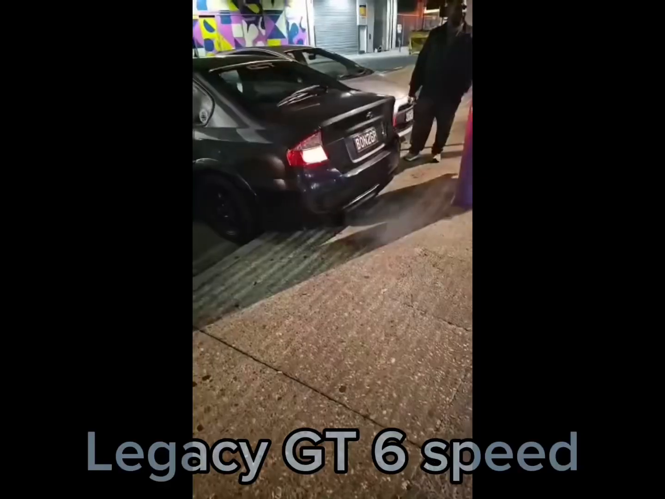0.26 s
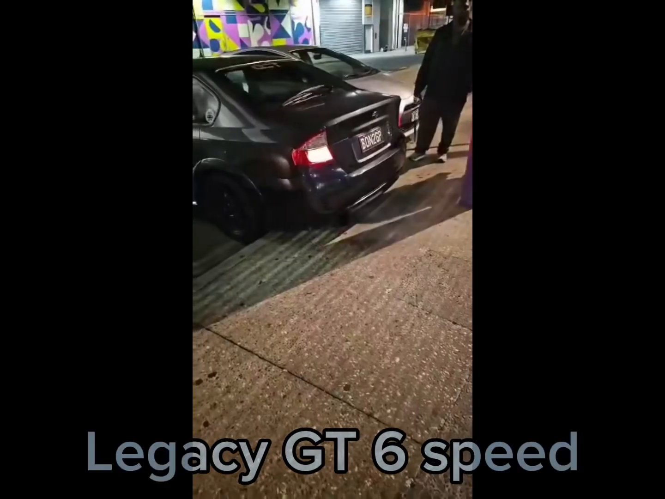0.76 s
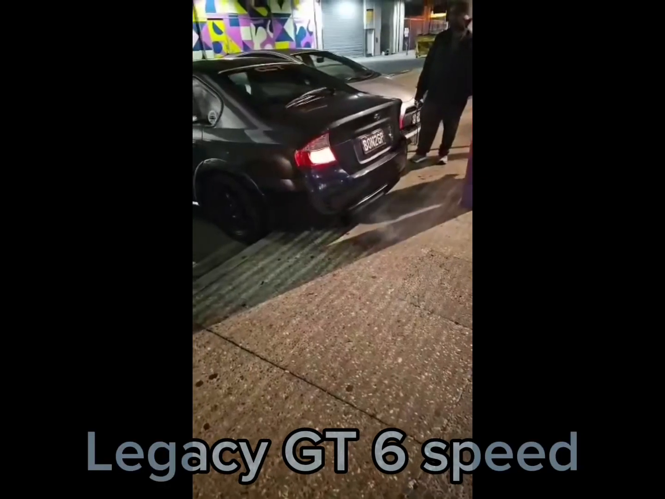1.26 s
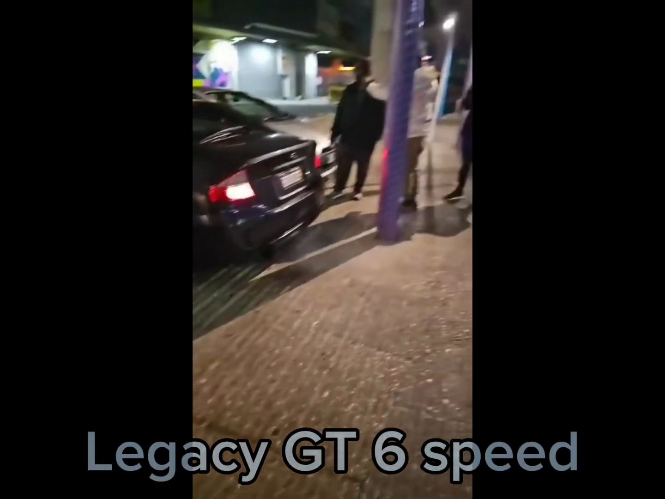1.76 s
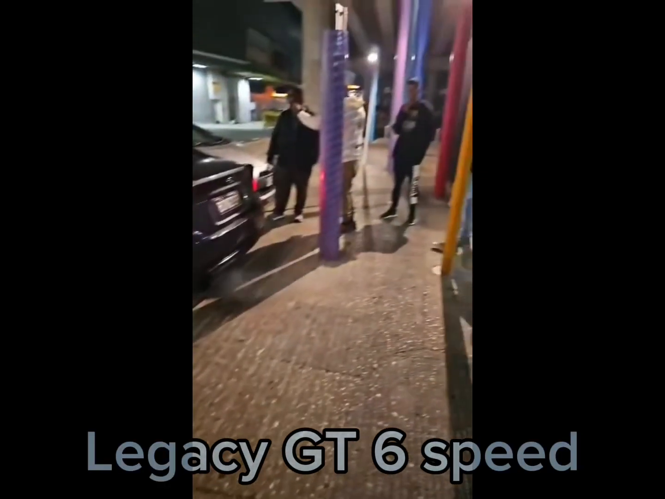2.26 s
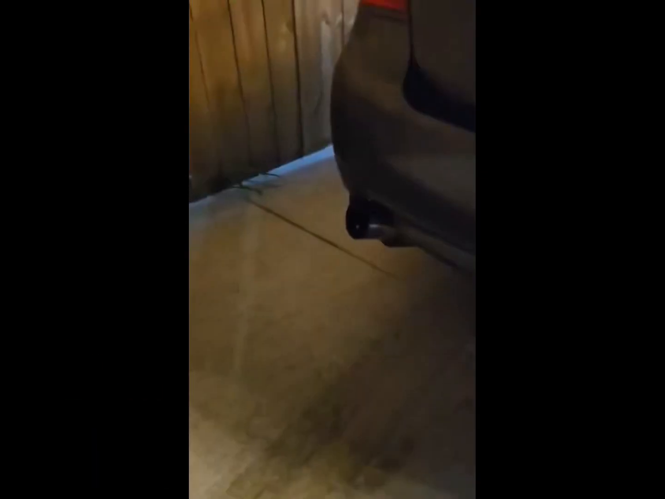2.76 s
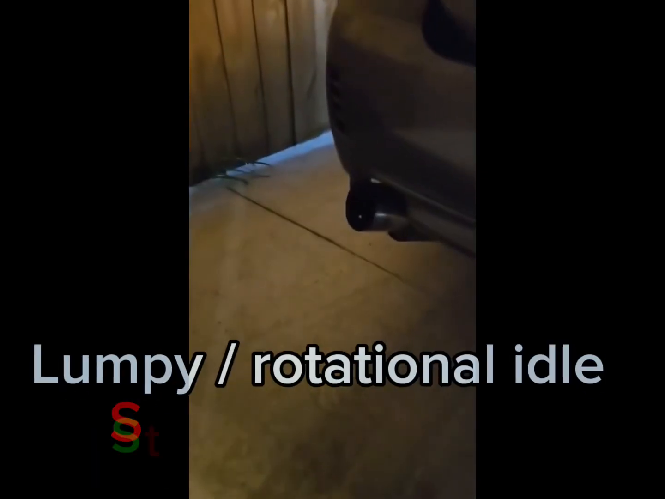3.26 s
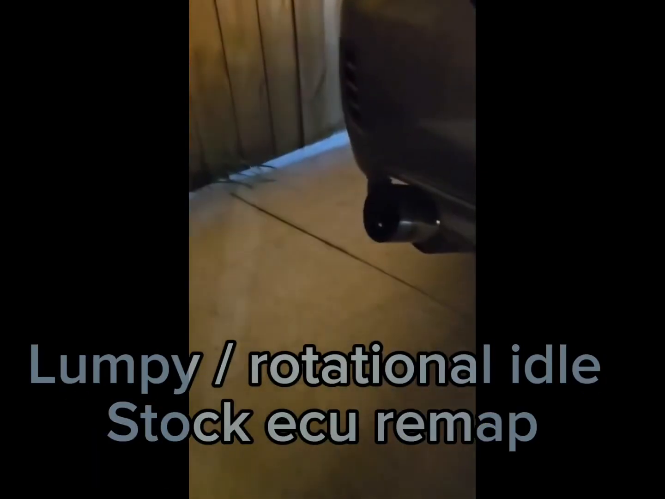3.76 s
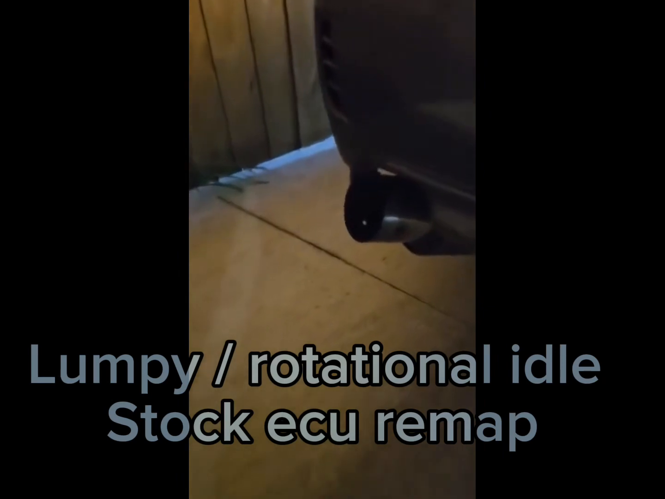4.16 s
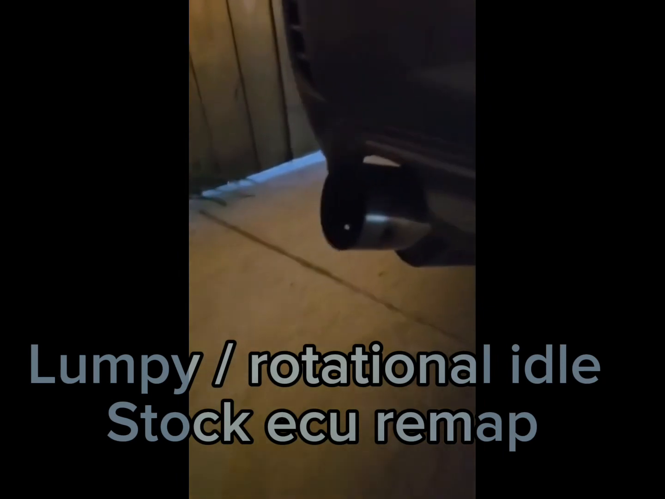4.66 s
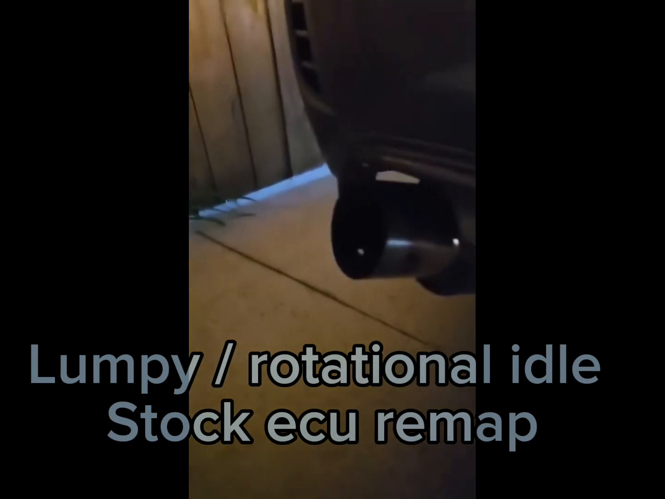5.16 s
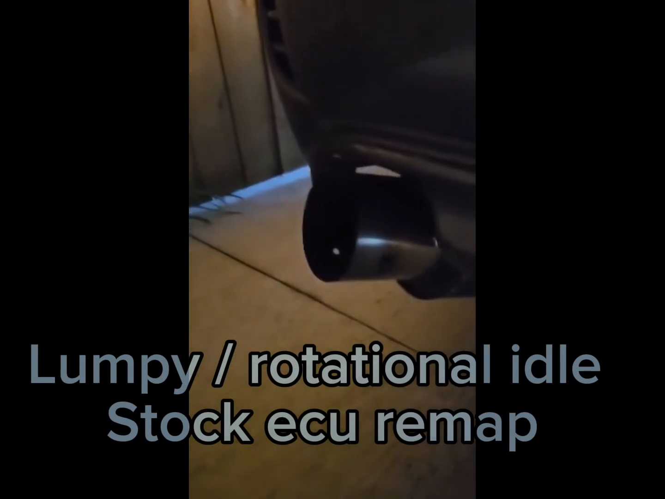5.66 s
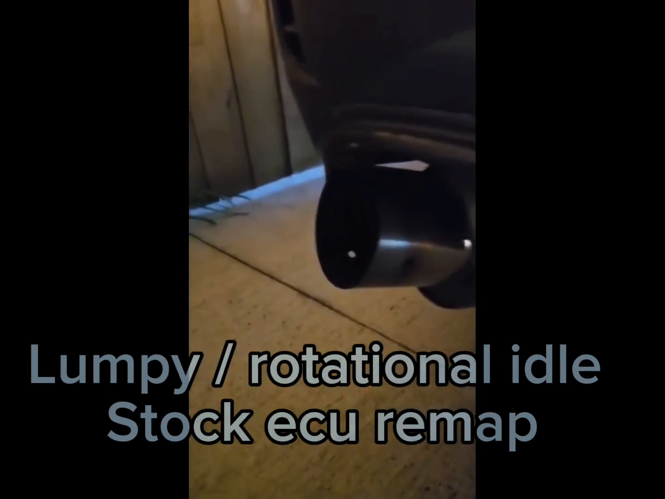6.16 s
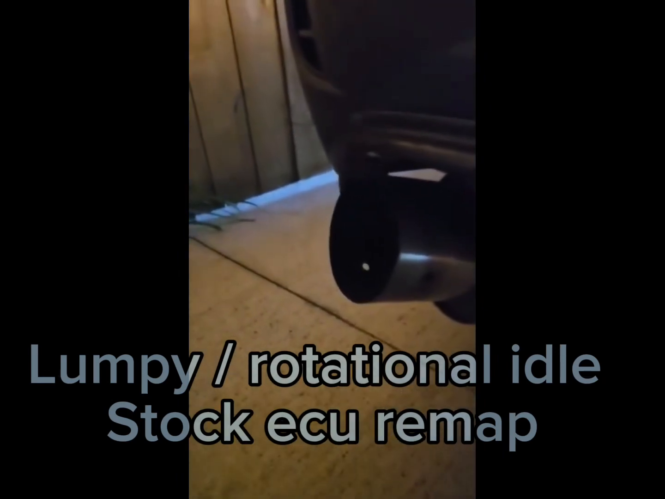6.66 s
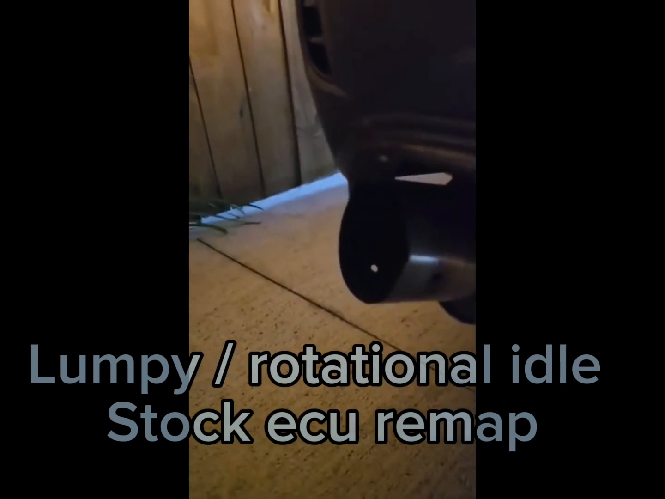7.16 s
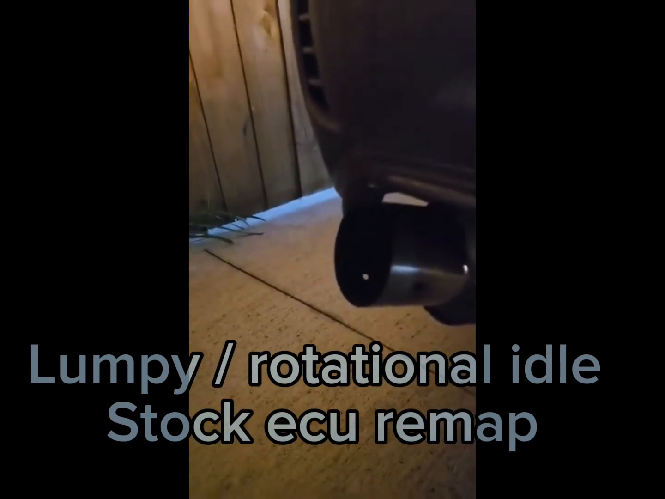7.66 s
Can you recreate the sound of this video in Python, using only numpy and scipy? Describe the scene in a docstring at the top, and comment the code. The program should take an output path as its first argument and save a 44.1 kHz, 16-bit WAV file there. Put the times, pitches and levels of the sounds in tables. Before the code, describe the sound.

Uneven, loping car exhaust idle: deep thuds, irregular pops and a short surge about every second, heard a few steps away, then right beside the pipe.

```python
"""A lumpy idle: sharp pops over a low thud, with a short surge about once a second, first in a street, then close by.
It is a turbocharged flat-four, heard a few steps away in mono, then in stereo by the tailpipe in a driveway.
The engine coasts on weak strokes, fires a lone pop every few strokes, and catches in surges where all fire.
Each stroke is a pressure pulse that echoes in the exhaust pipe and drives a puff of hissing gas out of the tip.
A drone follows the crank; rasp, reverberation and quiet background noise surround the strokes."""
import sys
import numpy as np
from scipy import signal
from scipy.fft import rfft, irfft, next_fast_len
from scipy.io import wavfile
from scipy.ndimage import uniform_filter1d, map_coordinates

SR = 44100
rng = np.random.default_rng(int(sys.argv[2]) if len(sys.argv) > 2 else 0)


def generate_wav(sig):
    """Save sig (samples, or channels by samples) to the path in sys.argv[1] as 16-bit PCM at SR."""
    pcm = np.round(np.clip(np.atleast_2d(sig).T, -1, 1) * 32767).astype(np.int16)
    wavfile.write(sys.argv[1], SR, pcm)


N = 349272

# when each place is heard: (start [s], end [s])
STREET_SPAN = (.319, 2.627)
DRIVEWAY_SPAN = (2.884, 8.0)
# surges, in which every cylinder fires:
# (start [s], end [s], firings [count], thump [dB], bark [dB re thump], hiss [dB])
SURGES = [(0.322, 0.414, 5, -7.5, -15, -40), (0.677, 0.911, 12, -6.5, -17.5, -38.5),
          (1.3474, 1.596, 12, -7.5, -17.5, -38), (2.0437, 2.283, 12, -8, -18, -38),
          (3.4147, 3.5996, 10, -8.5, -4, -29), (4.2107, 4.446, 12, -8.5, -7.5, -28.5),
          (5.1367, 5.367, 12, -9.5, -5, -29.5), (6.23, 6.4026, 9, -7.5, -4, -29.5),
          (7.009, 7.14, 7, -8.5, -6.5, -28.5)]
# relative spectrum of the turbulence in the pulse: (frequency [Hz], level [dB])
RASP_SPECTRUM = [(200, -47.5), (420, 8), (600, -3.5), (850, -3.5), (1150, -21), (1700, -20), (2100, -45),
                 (4000, -56)]
SAG_RATE, FULL_RATE = 39.5, 57  # strokes a second: at its slowest, and where steady firing would take it
SUCTION_HZ = 90  # corner of the phase turn that leaves suction behind each pulse


def amp(db):
    """Decibels to a linear factor."""
    return 10 ** (np.asarray(db) / 20)


def unit(x):
    """x scaled to an rms of 1."""
    return x / np.sqrt(np.mean(x ** 2) + 1e-20)


def along(points, hz):
    """Read a curve of (frequency, value) points on a log frequency axis."""
    f, v = np.transpose(points)
    return np.interp(np.log(hz + 1), np.log(f + 1), v)


def filtered(x, response):
    """x times a complex response of frequency."""
    m = next_fast_len(N + SR // 2)
    return irfft(rfft(x, m) * response(np.fft.rfftfreq(m, 1 / SR)), m)[..., :N]


def causal(db):
    """Minimum-phase pulses: the promptest ones that have these spectra."""
    cepstrum = irfft(db * np.log(10) / 20)
    half = cepstrum.shape[-1] // 2
    cepstrum[..., 1:half] *= 2
    cepstrum[..., half + 1:] = 0
    return irfft(np.exp(rfft(cepstrum)))


def placed(times, shapes):
    """Mix one row of shapes in at each time."""
    index = np.round(times * SR).astype(int)[:, None] + np.arange(shapes.shape[1])
    return np.bincount(index.ravel(), shapes.ravel(), N)[:N]


def during(span, fade=0.0021):
    """Gate: 1 inside the span, 0 outside, with short linear fades [s]."""
    t = np.arange(N) / SR
    return np.clip(np.minimum(t - span[0], span[1] - t) / fade, 0, 1)


def wobble(rate):
    """A smooth random curve, rate knots a second."""
    knots = rng.standard_normal(int(N * rate / SR) + 4)
    return map_coordinates(knots, [np.arange(N) * rate / SR])


def noise(spectrum, apart, patchy_db):
    """Stereo noise of rms 1 whose colour shifts from moment to moment; apart sets the width."""
    z = signal.stft(rng.standard_normal((2, N)), nperseg=512)[2]
    field = rng.standard_normal(z.shape[1:])
    field = uniform_filter1d(field, size=9, axis=0)  # smooth over frequency
    field = uniform_filter1d(field, size=6, axis=1)  # smooth over time
    pair = signal.istft(z * amp(patchy_db * unit(field)), nperseg=512)[1][:, :N]
    mid, side = filtered(pair, lambda hz: amp(along(spectrum, hz)))
    return unit(np.array([mid + apart * side, mid - apart * side]))


def crank_speed(t):
    """Strokes a second: the crank spins up during each surge, then sags until the next one catches it."""
    spin_up_s, spin_down_power = 0.194, 1.1  # time constant of the climb; curvature of the fall
    speed = np.full(len(t), float(SAG_RATE))
    catches = [surge[0] for surge in SURGES] + [STREET_SPAN[1], DRIVEWAY_SPAN[1]]
    for start, end, *_ in SURGES:
        catch = min(s for s in catches if s > end)
        climb = 1 - np.exp(-np.clip(t - start, 0, end - start) / spin_up_s)
        sag = np.clip((catch - t) / (catch - end), 0, 1) ** spin_down_power
        speed += (FULL_RATE - SAG_RATE) * climb * sag
    return speed


def crank_turn(start, end, size=64):
    """A grid of times and the strokes completed by each of them."""
    t = np.linspace(start, end, size)
    return t, np.append(0, np.cumsum(crank_speed(t[1:]) * np.diff(t)))


def coast_level(t):
    """Thump of an unfired stroke in dB: a faster crank pumps harder."""
    # level with the crank at its slowest: (time [s], level [dB])
    slowest = [(.3, -17), (.6, -11), (1.3, -28), (2.6, -29), (2.9, -8), (3.9, -11.5), (7.9, -14)]
    db_per_rate = 0.1  # dB for each extra stroke a second
    return np.interp(t, *np.transpose(slowest)) + db_per_rate * (crank_speed(t) - SAG_RATE)


def firings(span, pop_bark_db, kick_db, sharpen_db_per_s, fade_db_per_s, scatter_db):
    """Fired strokes (s, thump, bark, hiss dB): lone pops, and surges that kick in, sharpen and lose hiss.

    The puffs of a surge fade as the turbine smooths them."""
    # lone pops between the surges: (time [s], thump [dB], hiss [dB])
    pops = [(0.4811, -2, -35), (0.5524, -3, -34), (0.9731, -6.5, -45), (1.1501, -4, -41.5),
            (1.222, -6.5, -38.5), (1.6585, -13.5, -46), (1.7713, -7, -41), (1.8436, -13.5, -40.5),
            (1.9154, -8, -37.5), (2.344, -4.5, -39.5), (2.4549, -7, -38.5), (2.5239, -4.5, -37.5),
            (2.5958, -7, -35), (2.8842, -0.5, -34), (2.9082, 1.5, -20.5), (2.978, -1, -20),
            (3.0977, 1.5, -27), (3.17, 1.5, -22.5), (3.2425, -2, -24.5), (3.3663, -2, -28),
            (3.661, -7, -32), (3.7656, -3, -31), (3.8295, -5.5, -29.5), (4.0134, -4.5, -30),
            (4.0862, -3, -27.5), (4.5087, -3.5, -33.5), (4.6168, -5, -35.5), (4.6832, -3, -28),
            (4.7498, -4.5, -28.5), (4.864, -4, -31.5), (4.934, -7, -28.5), (5.424, -9.5, -33.5),
            (5.528, -7, -34.5), (5.5913, -6.5, -31.5), (5.7014, -4.5, -32), (5.7688, -4.5, -29),
            (5.8387, -2.5, -27), (5.9565, -3.5, -32), (6.0308, -2.5, -29), (6.1035, -4, -28.5),
            (6.4614, -9, -34.5), (6.5216, -7, -29.5), (6.6316, -4, -34.5), (6.6983, -4.5, -30),
            (6.8858, -7.5, -31.5), (6.9597, -5.5, -29), (7.2028, -3.5, -31), (7.3096, -3.5, -33),
            (7.3751, -0.5, -27), (7.487, -4, -33.5), (7.5554, -2, -28.5), (7.6234, -3.5, -30),
            (7.738, -2.5, -31.5), (7.808, -6, -30)]
    # firings that burn harder than the rest and crack: (time [s], extra bark [dB])
    cracks = [(.323, 10), (1.43, 7.5), (2.908, 5), (2.978, 4.5), (3.366, 4), (4.26, 9.5), (4.864, 4.5),
              (5.25, 7), (5.366, 4), (6.402, 3), (7.119, 6.5), (7.738, 2.5)]
    kick_s = 0.054  # decay constant of the harder start of a surge
    rows = [(s, thump_db, pop_bark_db, hiss_db) for s, thump_db, hiss_db in pops]
    for start, end, count, *levels in SURGES:
        t, crank = crank_turn(start, end)
        s = np.interp(np.linspace(0, crank[-1], count), crank, t)
        age = s - start
        kick = kick_db * np.exp(-age / kick_s)
        trend = np.column_stack([kick, sharpen_db_per_s * age, -fade_db_per_s * age])
        scatter = scatter_db * np.tanh(rng.standard_normal(trend.shape))
        rows += map(tuple, np.column_stack([s, levels + trend + scatter]))
    rows = np.array(sorted(rows))
    for s, extra_db in cracks:
        nearest = np.abs(rows[:, 0] - s).argmin()
        rows[nearest, 2] += extra_db
    return rows[(rows[:, 0] > span[0] - .1) & (rows[:, 0] < span[1])]


def strokes(fired, span, coast_bark_db, coast_hiss_db, scatter_db, jitter):
    """Every stroke as (s, thump, bark, hiss dB): weak unfired strokes fill the gaps between the firings."""
    # unequal headers, one row a cylinder: (lateness [strokes], level [dB])
    cylinders = [(-0.009, 3), (0.068, -1.5), (-0.0025, 1.5), (-0.066, -3)]
    rows, turn = list(fired), 0
    for a, b in zip(fired[:, 0], [*fired[1:, 0], span[1]]):
        t, crank = crank_turn(a, b)
        count = max(1, round(crank[-1]))
        for k in range(1, count):
            late, cylinder_db = cylinders[(turn + k) % len(cylinders)]
            chance = rng.standard_normal(size=4)
            s = np.interp((k + late) / count * crank[-1], crank, t) + jitter * chance[0]
            thump_db = coast_level(np.array([s]))[0] + cylinder_db
            levels = np.array([thump_db, coast_bark_db, coast_hiss_db])
            rows.append([s, *(levels + scatter_db * np.tanh(chance[1:]))])
        turn += count
    return np.array(rows)


def pulses(rows, spectrum, usual_bark_db, size=4096):
    """One pressure pulse a stroke; a harder burn has a steeper front."""
    # a sharper burn lifts the mids: (frequency [Hz], lift [dB per dB of bark])
    bark_lift = [(200, 0.045), (450, 1.11), (900, 1.8), (2000, 0.51)]
    s, thump_db, bark_db, _ = rows.T
    hz = np.fft.rfftfreq(size, 1 / SR)
    body = along(spectrum, hz)
    shapes = causal(body + np.outer(bark_db - usual_bark_db, along(bark_lift, hz)))
    return placed(s, shapes * amp(thump_db)[:, None] / np.abs(causal(body)).max())


def drone(times, db):
    """Smooth low orders of the pumping pistons, which follow the crank as it sags and picks up."""
    # sine partials: (multiple of the stroke rate [ratio], level [dB])
    partials = [(1, -10), (2, -8.5), (3, -11), (4, -36), (5, -27.5), (6, -26.5)]
    t = np.arange(N) / SR
    crank = np.interp(t, np.sort(times), np.arange(len(times)))  # strokes so far
    crank = uniform_filter1d(crank, size=3000)
    orders = sum(amp(level) * np.sin(2 * np.pi * k * crank) for k, level in partials)
    # the silencer cancels a narrow band
    orders = filtered(orders, lambda hz: amp(-12 * np.exp(-((hz - 153) / 11) ** 2)))
    level_db = db + coast_level(t) + .7 * wobble(12)
    return orders * amp(level_db) * during((times.min(), times.max() + .02))


def pipe(x, modes, trip, echo, dull_hz, suck_hz):
    """Pulses run up and down the exhaust, duller each time, ring its resonances and leave suction behind."""
    def bounce(f):
        return 1 / (1 - echo * np.exp(-2j * np.pi * f * trip) / (1 + 1j * f / dull_hz))

    def ring(f):
        return 1 + sum(amp(db) * 1j * f * w / (c * c - f * f + 1j * f * w) for c, w, db in modes)

    def suction(f):
        return (1j * f - suck_hz) / (1j * f + suck_hz)

    return filtered(x, lambda f: bounce(f) * ring(f) * suction(f))


def puffs(times, db, rise, fall):
    """Envelope of the gas flow: each stroke swells and dies away, and overlaps add in power."""
    t = np.arange(SR // 8) / SR
    shape = (1 - np.exp(-(t / rise) ** 2)) * np.exp(-t / fall)
    return np.sqrt(placed(times, np.outer(amp(db), shape / shape.max()) ** 2))


def rasp_noise(rows, db, rise, fall, apart):
    """Turbulence in the pulse: coloured noise that follows the thump and bark of each stroke."""
    s, thump_db, bark_db, _ = rows.T
    return puffs(s, thump_db + bark_db + db, rise, fall) * noise(RASP_SPECTRUM, apart, patchy_db=2.5)


def gas_flow(rows, db, rise, fall, sputter_db):
    """Strength of the hiss: one sputtering puff a stroke, in surges as elsewhere."""
    sputter = unit(amp(sputter_db * wobble(700)))
    return puffs(rows[:, 0], rows[:, 3] + db, rise, fall) * sputter


def reverb(x, t60, count=16):
    """A diffuse stereo tail, built from count successive random tails, so no single tail colours the whole."""
    out, size = np.zeros((2, N + SR)), N // count + 1
    for start in range(0, N, size):
        hz, t, z = signal.stft(rng.standard_normal((2, SR // 2)), SR, nperseg=256)
        decay = amp(-60 * t / along(t60, hz)[:, None])
        tail = signal.istft(z * decay, SR, nperseg=256)[1]
        tail[:, :SR // 200] = 0  # 5 ms before the first reflections
        tail = unit(tail) / np.sqrt(tail.shape[1])
        wet = signal.fftconvolve(x[:, start:start + size], tail, axes=1)
        out[:, start:start + wet.shape[1]] += wet
    return out[:, :N]


def street_background():
    """Coloured air noise and a thin sine whine of constant pitch, fading together, fastest at first."""
    # relative spectrum of the air: (frequency [Hz], level [dB])
    air_spectrum = [(20, 6), (100, 2), (700, 16.5), (1500, -2), (2800, 2.5), (5500, -1), (9000, -15),
                    (13500, -20), (14400, -46.5)]
    t = np.arange(N) / SR
    whine = amp(-17.5) * np.sin(2 * np.pi * 2998 * t)
    air = noise(air_spectrum, 0, patchy_db=1.5)
    return (air + whine) * amp(np.interp(t, [.4, 1.2, 2.6], [-39, -50, -53]))


def street():
    """The car a few steps away between buildings, in mono: pipe boom, rasp, hiss, walls and background."""
    # relative spectrum of one pressure pulse: (frequency [Hz], level [dB])
    pulse_spectrum = [(15, -64), (30, -43.5), (45, -8), (80, 3), (130, 4.5), (220, 1.5), (320, -1),
                      (430, -5.5), (550, -11), (680, -22), (850, -31.5), (1200, -54.5), (2500, -49.5),
                      (6000, -93)]
    # resonances of silencer and surroundings: (frequency [Hz], width [Hz], level [dB])
    modes = [(144.8, 5.3, -3.5), (298.2, 10.5, -0.5), (345.5, 12, -5.5), (544.3, 15.6, 6), (813, 13, 17)]
    # relative spectrum of the gas leaving the tip: (frequency [Hz], level [dB])
    hiss_spectrum = [(500, -27.5), (900, 4), (1400, -9), (2000, -19), (2600, -5), (3100, -12), (3700, 2.5),
                     (4600, -3.5), (5800, 4.5), (7000, -4), (10000, -9), (12500, -6.5), (13900, -1),
                     (14400, -50.5)]
    # reverberation between the buildings: (frequency [Hz], time to fall 60 dB [s])
    wall_t60 = [(100, 0.63), (500, 0.52), (3000, 0.31), (12000, 0.23)]
    fired = firings(STREET_SPAN, pop_bark_db=-17, kick_db=2.1, sharpen_db_per_s=7.5,
                    fade_db_per_s=30, scatter_db=1.7)
    rows = strokes(fired, STREET_SPAN, coast_bark_db=-14.5, coast_hiss_db=-62, scatter_db=1.0, jitter=0.0005)
    pressure = pulses(rows, pulse_spectrum, usual_bark_db=-11.5) + drone(rows[:, 0], db=-9.0)
    boom = amp(1.5) * pipe(pressure, modes, trip=0.032, echo=0.17, dull_hz=900, suck_hz=SUCTION_HZ)
    rasp = rasp_noise(rows, db=-8.5, rise=0.0032, fall=0.012, apart=0)
    flow = gas_flow(rows, db=3.5, rise=0.003, fall=0.0053, sputter_db=-0.3)
    hiss = flow * noise(hiss_spectrum, 0, patchy_db=2.5)
    direct = boom + rasp + hiss
    walls = reverb(amp(-4.0) * boom + amp(-4.5) * (rasp + hiss), wall_t60)
    return (direct + walls + street_background())[0] * during(STREET_SPAN)


def bay_whirr():
    """Steady whirr of the engine bay, as quiet coloured noise."""
    # relative spectrum: (frequency [Hz], level [dB])
    whirr_spectrum = [(100, 5), (400, 17), (1200, 8), (2200, -18), (4000, 2), (5700, -4), (7200, -9),
                      (10500, -28), (12500, -39), (14000, -40)]
    return amp(-50) * noise(whirr_spectrum, 0.24, patchy_db=1.6)


def tip_eddies():
    """Low buffeting of eddies off the tip, as noise centred on the bass."""
    # relative spectrum: (frequency [Hz], level [dB])
    eddy_spectrum = [(10, -9), (22, -2), (40, 6), (65, 24), (110, -27), (300, -40)]
    return amp(-33.5) * noise(eddy_spectrum, .2, patchy_db=1.5)


def beside_pipe(near):
    """The sound reaches the left port first, and the balance of the ports varies with frequency."""
    # balance: (frequency [Hz], left minus right [dB])
    tilt = [(150, 0.33), (300, 1), (520, 4), (1000, -1.5), (2000, 0), (4500, -2.5), (8000, -1.3),
            (13000, 0.3)]
    lag, sides = 9e-5, np.array([[.5], [-.5]])  # s between the ports; half the difference to each
    return filtered(near, lambda hz: amp(sides * along(tilt, hz)) * np.exp(2j * np.pi * hz * lag * sides))


def driveway():
    """The tailpipe at arm's length by a wooden fence, in stereo: boom, rasp, hiss, reflections, whirr, eddies."""
    # relative spectrum of one pressure pulse: (frequency [Hz], level [dB])
    pulse_spectrum = [(15, -37), (30, -57.5), (45, -5), (75, 3.5), (110, -1.5), (180, -2), (260, -2.5),
                      (340, -17.5), (470, -6.5), (600, -8.5), (820, -20), (1150, -42), (2200, -50),
                      (6000, -81)]
    # resonances of silencer and surroundings: (frequency [Hz], width [Hz], level [dB])
    modes = [(107, 9.7, 4), (127, 6.2, -7.5), (248.8, 5.4, 0.5), (449.7, 20, -3.5), (523, 24, -6.5)]
    # relative spectrum of the gas leaving the tip: (frequency [Hz], level [dB])
    hiss_spectrum = [(600, -37), (1300, -10), (2000, -20.5), (2900, -20), (3800, -9.5), (5200, -3),
                     (6600, -2), (7400, 4.5), (9000, -3), (10400, -8), (11700, -3.5), (12900, -8),
                     (13500, -36), (14400, -50)]
    # reverberation by the fence: (frequency [Hz], time to fall 60 dB [s])
    fence_t60 = [(100, 0.39), (500, 0.52), (3000, 0.36), (12000, 0.2)]
    fired = firings(DRIVEWAY_SPAN, pop_bark_db=-7.0, kick_db=4.5, sharpen_db_per_s=1.5,
                    fade_db_per_s=60, scatter_db=2.5)
    rows = strokes(fired, DRIVEWAY_SPAN, coast_bark_db=-24.0, coast_hiss_db=-58.5,
                   scatter_db=4.0, jitter=0.00058)
    pressure = pulses(rows, pulse_spectrum, usual_bark_db=-4.0) + drone(rows[:, 0], db=-7)
    boom = amp(-0.5) * pipe(pressure, modes, trip=.0298, echo=0.34, dull_hz=1400, suck_hz=SUCTION_HZ)
    rasp = rasp_noise(rows, db=-13.0, rise=0.0011, fall=0.012, apart=0.31)
    flow = gas_flow(rows, db=3.0, rise=0.0043, fall=0.0094, sputter_db=0.5)
    hiss = flow * noise(hiss_spectrum, 0.79, patchy_db=3.4)
    wet = reverb(amp(-12.5) * (boom + rasp) + amp(-11.5) * hiss, fence_t60)
    # long waves reach both ports alike
    wet[1] += filtered(wet[0] - wet[1], lambda hz: 1 / (1 + (hz / 600) ** 2))
    near = boom + rasp + hiss + wet + bay_whirr() + tip_eddies()
    near = filtered(near, lambda hz: 1 / np.sqrt(1 + (hz / 13300) ** 70))  # steep treble limit
    return beside_pipe(near) * during(DRIVEWAY_SPAN)


def opening_boom(start=2.885, hz=258, db=-3, rise=0.013, fall=0.04):
    """The first close pop sets off a hollow boom: a sine that swells and dies away."""
    t = np.maximum(np.arange(N) / SR - start, 0)
    return amp(db) * np.sin(2 * np.pi * hz * t) * (1 - np.exp(-t / rise)) * np.exp(-t / fall)


def scene():
    """The street, then the driveway with its opening boom."""
    return street() + driveway() + opening_boom()


def record(dry):
    """Soft saturation rounds off the highest peaks; a steep low-pass then sets the band limit."""
    top_hz = 14000
    rounded = dry / (1 + np.abs(dry) ** 8) ** (1 / 8)
    return filtered(rounded, lambda hz: 1 / np.sqrt(1 + (hz / top_hz) ** 120))


dry = scene()
out = record(dry)
generate_wav(out)
```